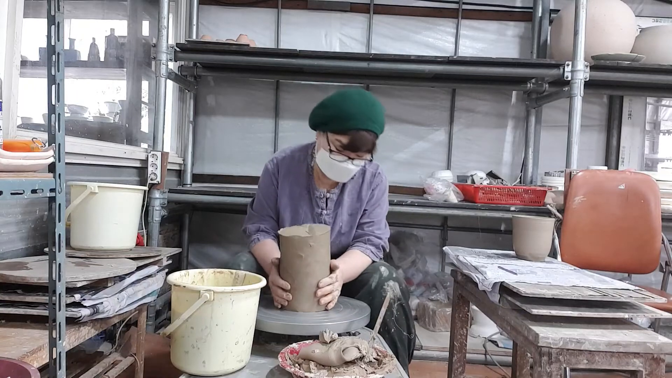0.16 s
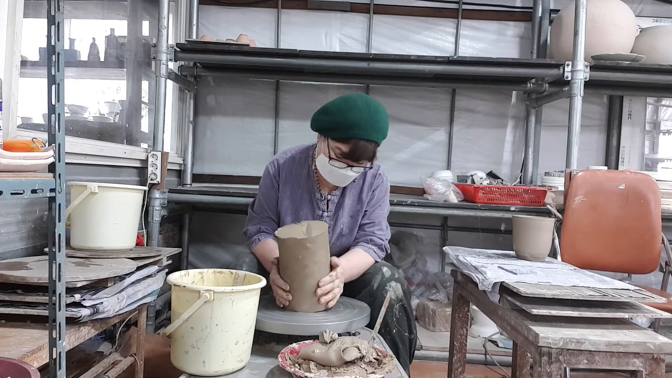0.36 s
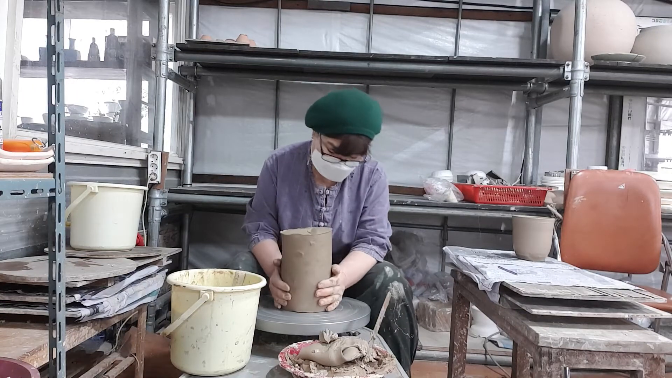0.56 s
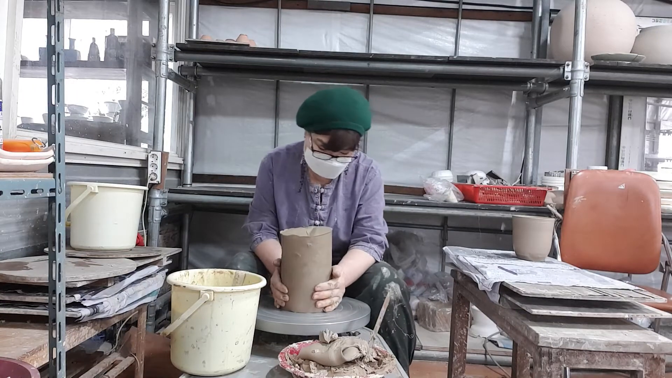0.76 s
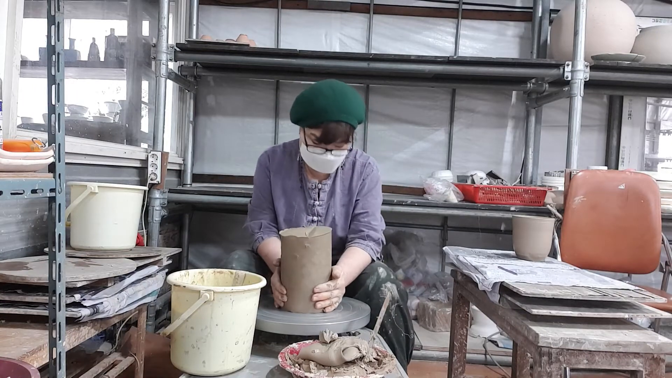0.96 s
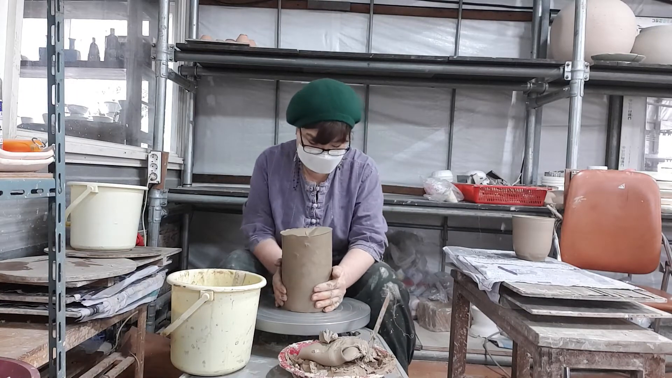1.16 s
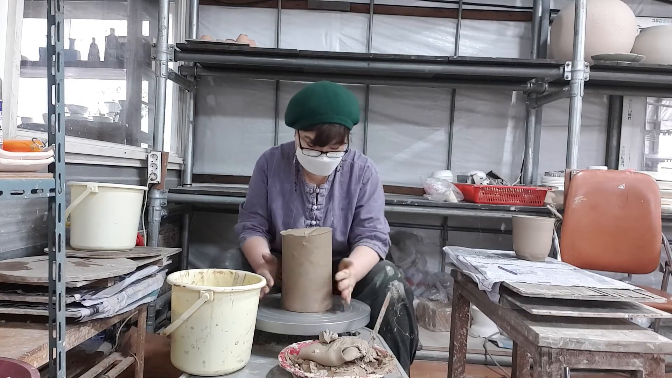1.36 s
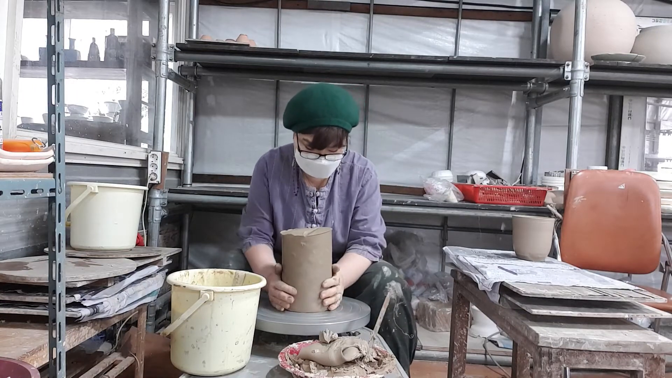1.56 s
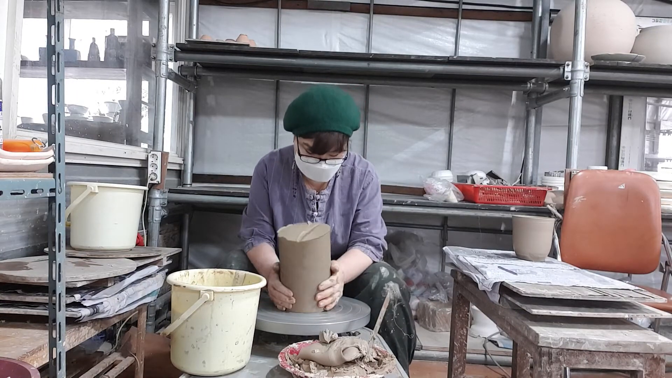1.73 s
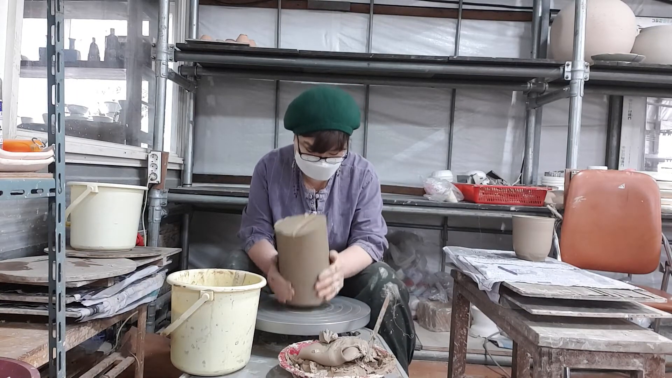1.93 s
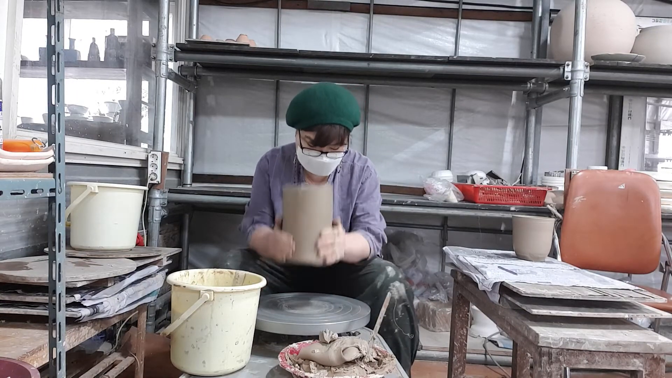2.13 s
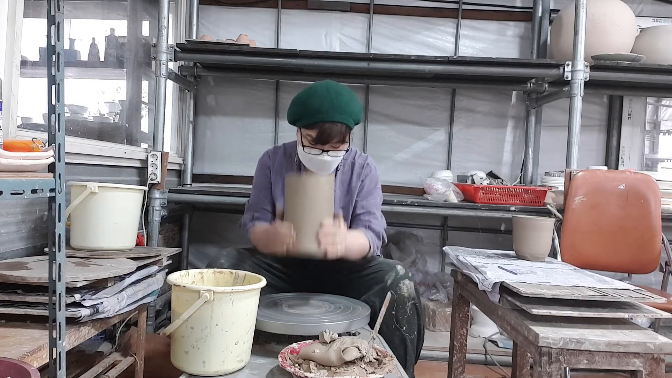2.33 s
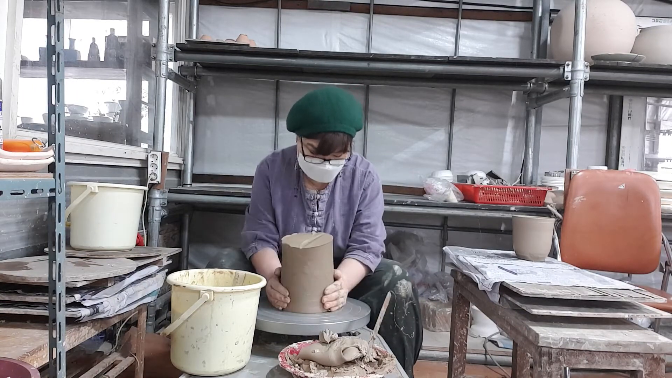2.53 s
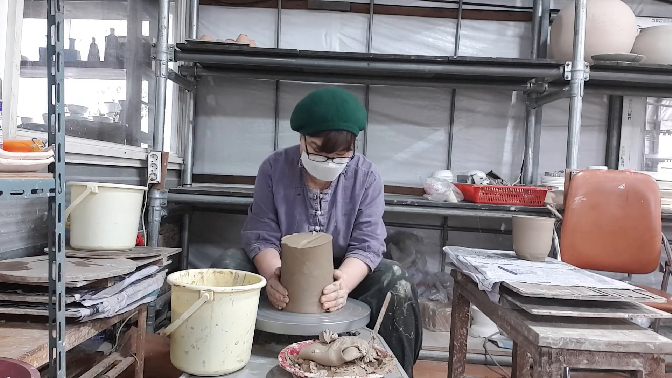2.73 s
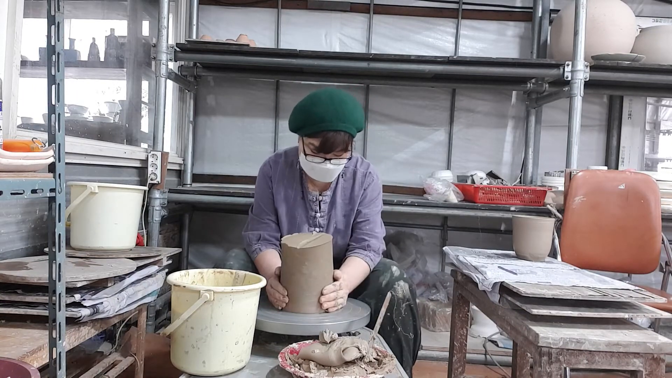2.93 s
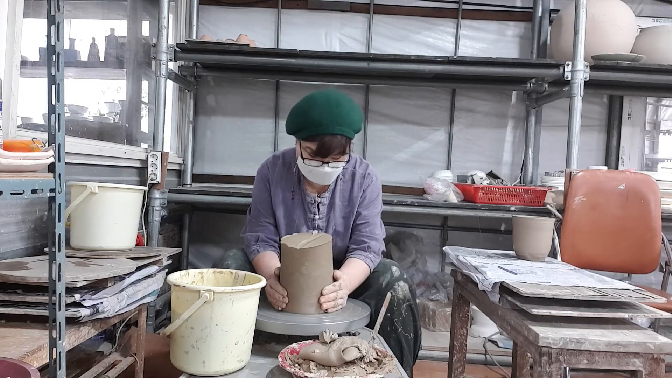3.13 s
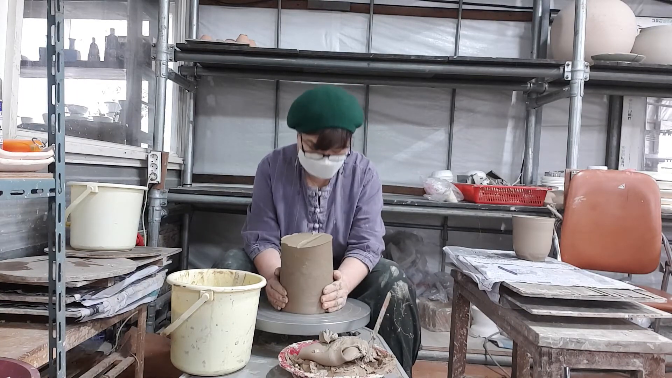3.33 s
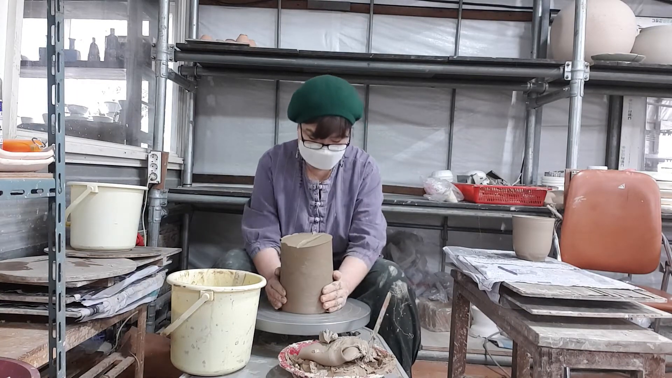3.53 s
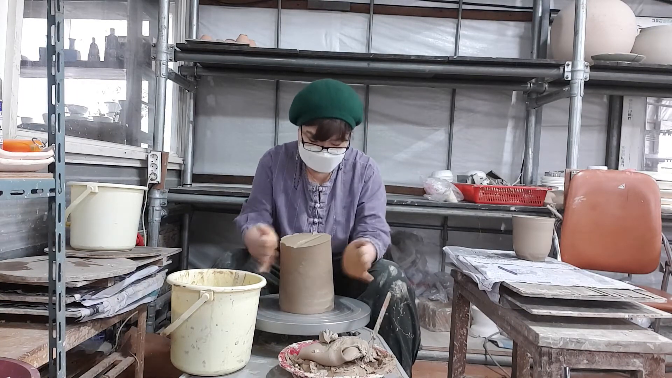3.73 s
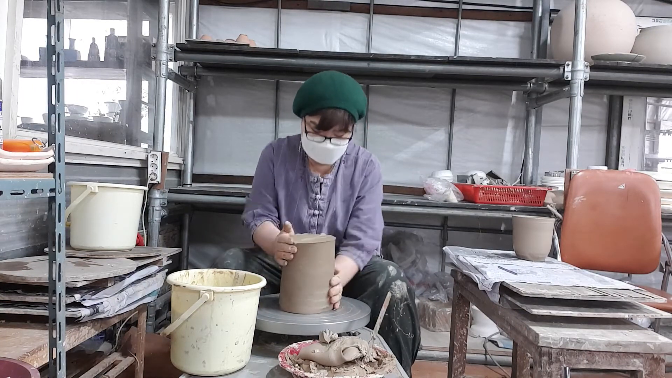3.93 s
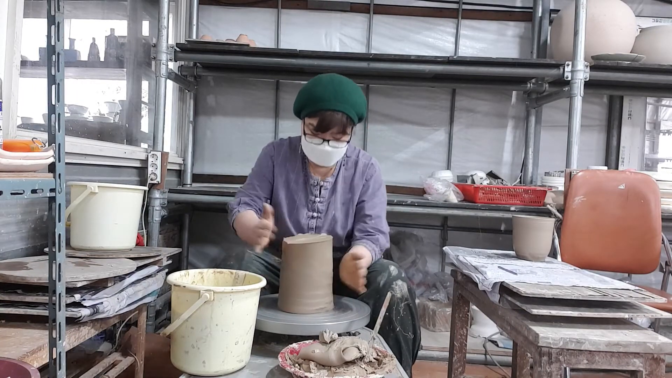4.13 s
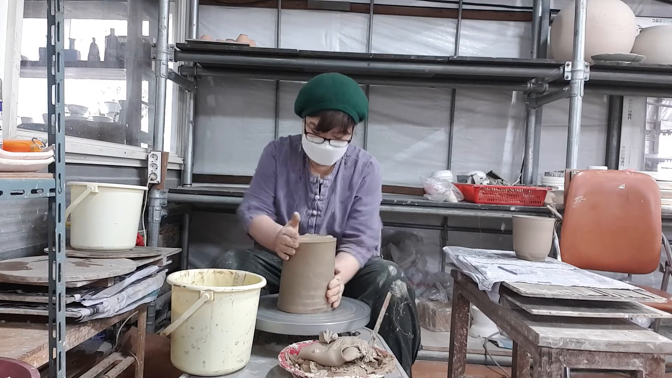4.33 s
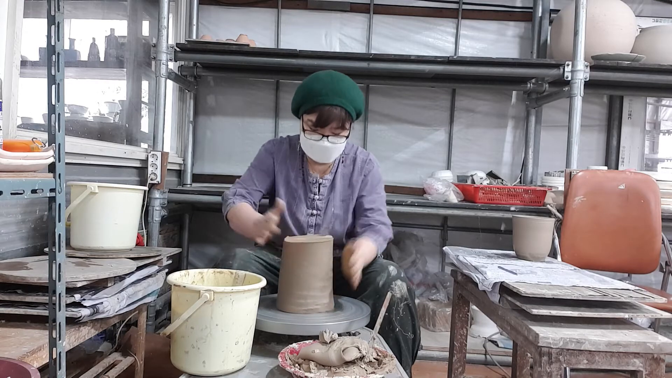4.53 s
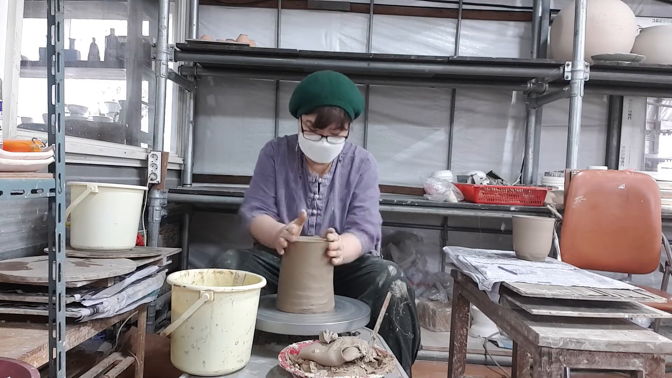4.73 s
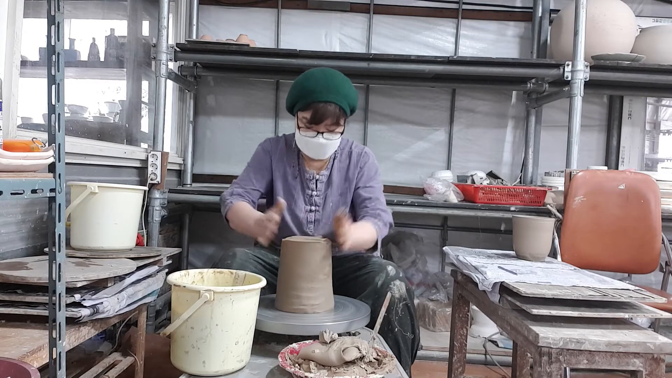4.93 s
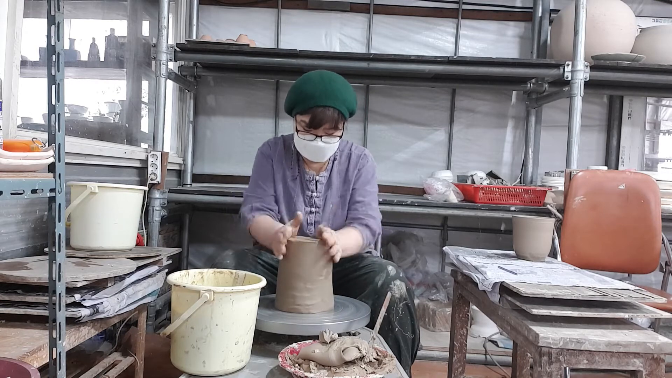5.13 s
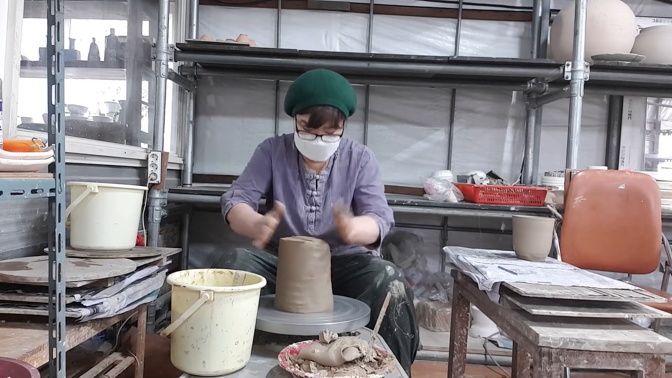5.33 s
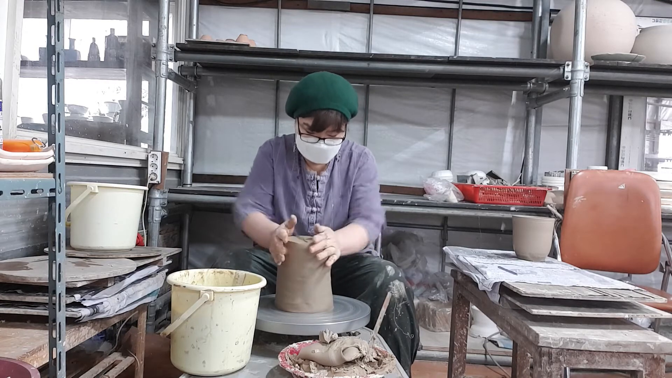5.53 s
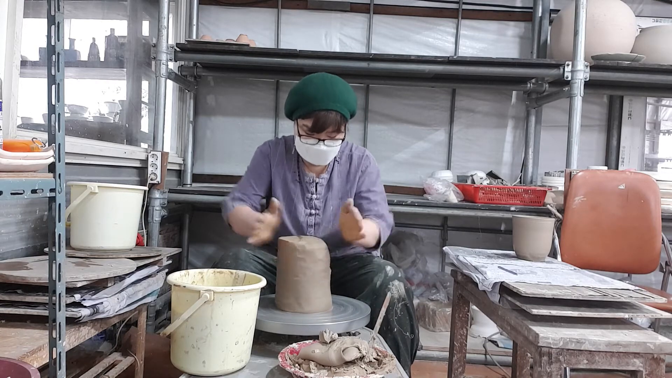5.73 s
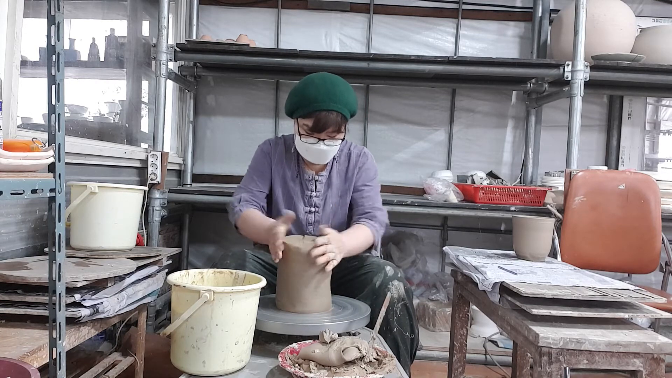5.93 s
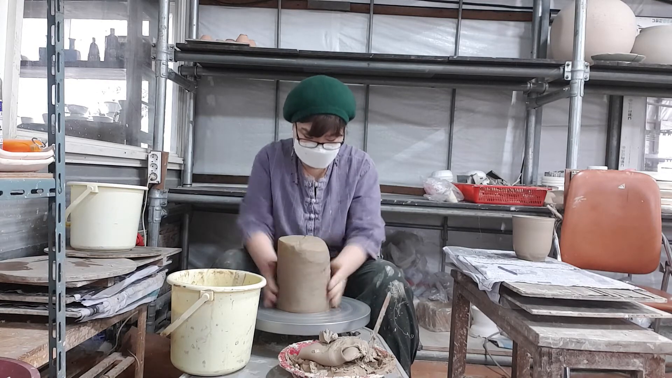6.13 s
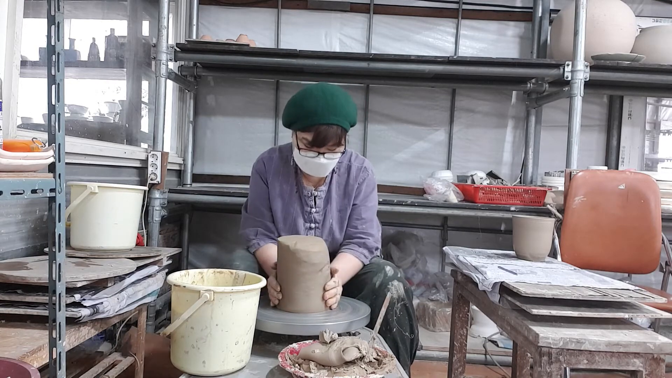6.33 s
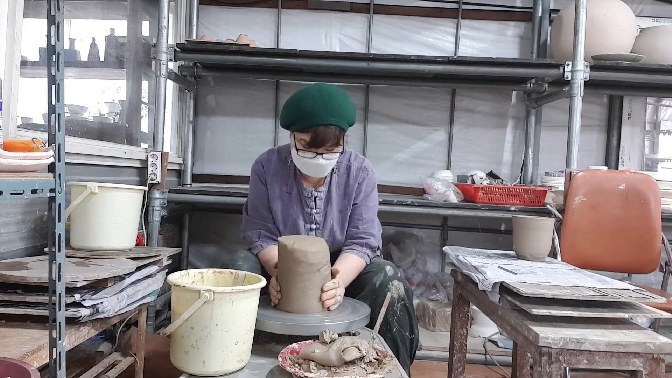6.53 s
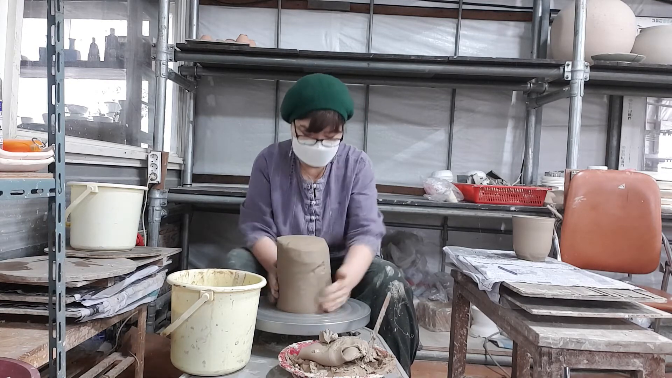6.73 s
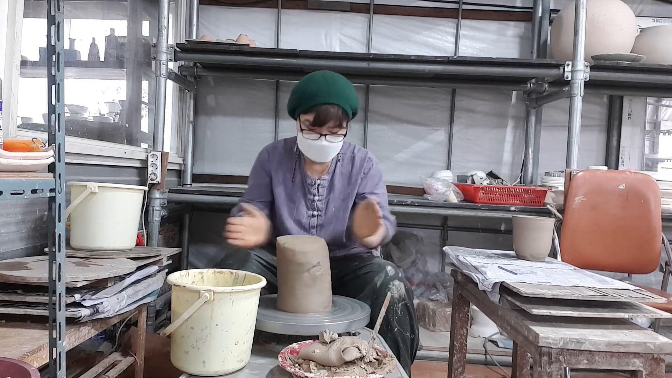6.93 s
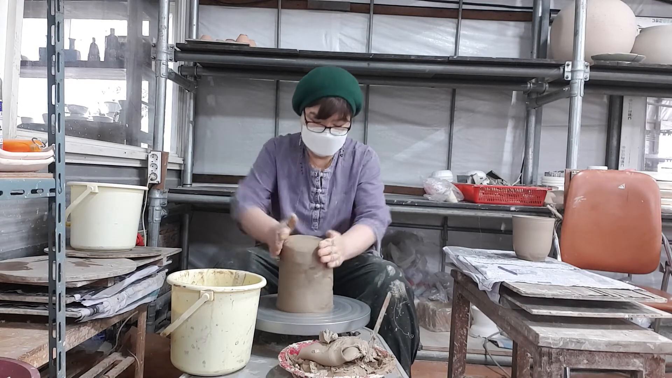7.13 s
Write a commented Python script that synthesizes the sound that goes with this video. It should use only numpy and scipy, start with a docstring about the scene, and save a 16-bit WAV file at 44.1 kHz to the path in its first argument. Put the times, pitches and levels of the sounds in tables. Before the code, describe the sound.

A potter works a lump of wet clay in a hard-walled workshop. Faint sticky noises lead to a grainy peel as the lump lifts off, then a heavy wet slam makes the metal wheel head ring briefly. After a pause come uneven wet pats, the last crisp and strong. Low traffic rumble and engine drones continue outside. Stereo microphones stand a few metres away, with slight hiss.

```python
"""A potter peels wet clay off a kick wheel, slams it back on the wheel head and pats it toward the centre.
Slaps are short coloured bursts, peeling is grainy noise, and the wheel rings as a bank of dying sines.
A hard-walled workshop answers the clay at once and then with a short noise tail.
On a road outside, traffic rumbles as bands of noise and drones as gliding tones, under a faint hiss."""
import sys
import numpy as np
from scipy import signal
from scipy.fft import rfft, irfft, next_fast_len
from scipy.io import wavfile
from scipy.ndimage import map_coordinates

SR = 44100
rng = np.random.default_rng(int(sys.argv[2]) if len(sys.argv) > 2 else 0)


def put_to_file(sound):
    """Save the sound as 16-bit audio at rate SR, in the file named by the first command-line argument."""
    columns = np.atleast_2d(sound).T  # one column per channel
    safe = np.clip(columns, -1, 1)
    whole_steps = np.round(safe * 32767)
    wavfile.write(sys.argv[1], SR, whole_steps.astype(np.int16))


N = 320827  # length in samples


def amp(db):
    """Decibels to gain."""
    return 10 ** (np.asarray(db) / 20)


def unit(x):
    """Scale to rms 1."""
    return x / np.sqrt(np.mean(x ** 2) + 1e-20)


def along(points, hz):
    """Read (Hz, value) points on a log frequency axis."""
    f, v = np.transpose(points)
    return np.interp(np.log(hz + 1), np.log(f + 1), v)


def wobble(rate):
    """A smooth random curve with rate knots a second."""
    knots = rng.standard_normal(int(N * rate / SR) + 4)
    return map_coordinates(knots, [np.arange(N) * rate / SR])


def swell(s, half):
    """A smooth rise and fall around time s."""
    return np.exp(-((np.arange(N) / SR - s) / half) ** 2)


def band(hz, centre, q, order=2):
    """Gain of a broad resonance with steep skirts."""
    detuning = q * ((hz + 1) / centre - centre / (hz + 1))
    return 1 / np.hypot(1, detuning ** order)


def filtered(x, response):
    """Multiply the spectrum of x by a response of frequency."""
    m = next_fast_len(N + SR // 2)
    return irfft(rfft(x, m) * response(np.fft.rfftfreq(m, 1 / SR)), m)[..., :N]


def add(track, s, sound):
    """Mix a sound in at time s."""
    part = track[..., round(s * SR):][..., :sound.shape[-1]]
    part += sound[..., :part.shape[-1]]


# How alike diffuse sound is at the two microphones. Each row: frequency in Hz, left-right likeness (-1 to 1).
LIKENESS = [(60, 0.91), (250, 0.97), (500, 0.62), (800, .1), (1400, -0.26), (3000, .05), (10000, .03)]


def rush(spectrum):
    """Diffuse stereo noise of rms 1: the mid and side shares set the likeness of left and right."""
    def mid_side_gains(hz):
        turn = np.arccos(np.clip(along(LIKENESS, hz), -1, 1)) / 2
        return amp(along(spectrum, hz)) * [np.cos(turn), np.sin(turn)]

    mid, side = filtered(rng.standard_normal((2, N)), mid_side_gains)
    return unit(np.array([mid + side, mid - side]))


# The road outside as vehicles come and go. Each row: time in seconds, loudness in dB.
ROAD_LOUDNESS = [(0.0, -59), (0.69, -61), (1.01, -58.5), (1.74, -50), (2.24, -51.5), (2.47, -50),
                 (2.71, -52.5), (3.73, -52.5), (3.89, -52.5), (5.04, -50), (6.84, -58.5), (7.01, -57.5),
                 (7.27, -56.5)]
USUAL_DB = -54.5  # the road at its usual loudness


def road_above_usual():
    """Loudness of the road over its usual level, in dB for each sample."""
    seconds, db = np.transpose(ROAD_LOUDNESS)
    return np.interp(np.arange(N) / SR, seconds, db) - USUAL_DB


# Colour of the hiss. Each row: frequency in Hz, relative level in dB.
HISS_COLOUR = [(1000, 12), (4000, 3), (7500, -10), (10000, 12.5), (13000, 17.5), (15500, 17)]


def hiss(hiss_db=-80, grows=0.51):
    """A faint diffuse hiss gains grows dB for each dB of the road."""
    return amp(hiss_db + grows * road_above_usual()) * rush(HISS_COLOUR)


def drone(row, waver, waver_rate, overtone_db, flutter_db=1.0):
    """A far, unsteady tone with a weak octave swells and glides by."""
    s, half, centre_hz, glide, db = row
    hz = centre_hz + glide * (np.arange(N) / SR - s)
    phase = 2 * np.pi * np.cumsum(hz * (1 + waver * wobble(waver_rate))) / SR
    tone = np.sqrt(2) * (np.sin(phase) + amp(overtone_db) * np.sin(2 * phase))
    return amp(db + flutter_db * wobble(waver_rate)) * swell(s, half) * tone


# Colours of the road's rumble, body and tyre roar. Each row: frequency in Hz, relative level in dB.
RUMBLE_COLOUR = [(20, -16.5), (32, -18), (46, -4.5), (58, -.5), (78, -7.5), (105, -13.5), (150, -17.5),
                 (300, -85.5)]
BODY_COLOUR = [(70, -17), (120, 6), (160, 2.5), (195, 8), (260, 2), (350, -10), (600, -51)]
TYRE_COLOUR = [(200, -14.5), (350, -1.5), (520, -2), (700, -2), (920, 2), (1120, -3), (1300, -5.5),
               (1750, -10.5), (2300, -20.5), (2750, -27), (3200, -37), (4500, -42.5), (8000, -62)]
# Engines that drone up and fade. Each row: peak time in seconds, half length in seconds,
# pitch at the peak in Hz, glide in Hz per second, level in dB.
ENGINES = [(0.19, 0.25, 79, -5, -45), (1.658, 0.3, 76, 0.5, -40), (2.08, 0.12, 57, 10, -37.5),
           (3.25, 0.46, 68.3, -1, -39.5), (3.1, .5, 187, -0.5, -51), (4.1, .27, 122.8, -7.5, -45.5),
           (4.75, .3, 118, -9.5, -48), (3.5, 0.12, 62, -6.5, -38.5)]
RUMBLE_DB, BODY_DB, TYRE_DB = -41.5, -50, -50  # each layer at the usual loudness
# dB gained for each dB of the road: the bass also carries from far away
RUMBLE_GROWS, BODY_GROWS, TYRE_GROWS = .4, 0.6, 0.95


def traffic():
    """One loudness drives three noise layers, each wavering by itself; engine tones drone through them."""
    busy = road_above_usual()
    rumble = amp(RUMBLE_DB + RUMBLE_GROWS * busy + 0.77 * wobble(7.8)) * rush(RUMBLE_COLOUR)
    body = amp(BODY_DB + BODY_GROWS * busy + .9 * wobble(15)) * rush(BODY_COLOUR)
    roar = amp(TYRE_DB + TYRE_GROWS * busy + 0.65 * wobble(4.2)) * rush(TYRE_COLOUR)
    engines = sum(drone(row, waver=.004, waver_rate=9, overtone_db=-19.5) for row in ENGINES)
    return rumble + body + roar + engines


# A faint far squeal. One row: peak time in seconds, half length in seconds, pitch at the peak in Hz,
# glide in Hz per second, level in dB.
FAR_SQUEAL = (7.24, 0.02, 1121.5, -200, -50.5)
# Vague far-off noises. Each row: peak time in seconds, half length in seconds, centre in Hz, level in dB.
FAR_SWELLS = [(0.174, .073, 577, -58.5), (4.854, 0.063, 1830, -55), (5.5, .45, 125.6, -47),
              (5.905, 0.52, 253, -56), (6.28, .08, 606, -52)]


def far_noises(swell_q=1.94):
    """Soft swells of band-passed noise and one wavering squeal among the traffic."""
    out = drone(FAR_SQUEAL, waver=0.0048, waver_rate=81, overtone_db=-15)
    for s, half, centre_hz, db in FAR_SWELLS:
        noise = unit(filtered(rng.standard_normal((2, N)), lambda hz: band(hz, centre_hz, swell_q)))
        out = out + amp(db) * swell(s, half) * noise
    return out


# Decay of the hard-walled workshop. Each row: frequency in Hz, time to fall 60 dB in seconds.
ROOM_DECAY = [(100, 1), (500, 0.19), (1500, 0.3), (3000, 0.44), (5500, 0.54), (9000, 0.42), (12000, 0.39),
              (16000, 0.21)]


def workshop(x, near_db=-8, tail_db=-6, near_t60=0.081, build=0.023, bass_hz=500):
    """Nearby shelves scatter the sound at once; the hall's tail builds up behind them."""
    hz, frames, z = signal.stft(rng.standard_normal((2, SR)), SR, nperseg=256)
    decay = amp(-60 * frames / along(ROOM_DECAY, hz)[:, None])
    tail = signal.istft(z * decay, SR, nperseg=256)[1]
    t = np.arange(tail.shape[1]) / SR
    tail = tail * (1 - np.exp(-t / build))
    near = rng.standard_normal(tail.shape) * amp(-60 * t / near_t60) * (t > .002)
    answer = amp(near_db) * near / np.linalg.norm(near[0]) + amp(tail_db) * tail / np.linalg.norm(tail[0])
    # thin walls let the bass escape
    answer = signal.lfilter(*signal.butter(1, bass_hz, "high", fs=SR), answer)
    return signal.fftconvolve(x, answer, axes=1)[:, :N]


# Colour of tacky clay. Each row: frequency in Hz, relative level in dB.
TACKY_COLOUR = [(2000, -8), (4000, -17), (7300, -14), (9300, 1), (11000, -4.5), (15500, -6.5)]
# Sticky clay letting go of the wheel or the fingers. Each row: peak time in seconds,
# level in dB before the overall trim, rise in seconds, fall in seconds.
LETTING_GO = [(.225, -65.5, .05, 0.029), (.52, -67, .014, 0.012), (.83, -76, .05, 0.054),
              (1.34, -77, .03, .04), (1.49, -75, .05, .12), (1.725, -55, .032, 0.11),
              (1.91, -44.5, .008, 0.011), (2.88, -70, .008, 0.011), (3.65, -74.5, .05, 0.054),
              (6.2, -71.5, .03, .03), (6.756, -69, .03, 0.049)]


def peel(peel_db=-2, grain_db=4):
    """Sticky clay lets go as grainy noise that rises exponentially to a peak, then dies away."""
    t = np.arange(N) / SR
    pull = 0
    for s, db, rise, fall in LETTING_GO:
        pull = pull + amp(db) * np.exp(-np.maximum((s - t) / rise, (t - s) / fall))
    grains = unit(rush(TACKY_COLOUR) * amp(grain_db * wobble(900)))
    return amp(peel_db) * pull * grains


SLAM_S = 2.489  # the lump lands
# Ringing of the wheel head and frame. Each row: frequency in Hz, level in dB, time to fall 60 dB in seconds.
WHEEL_MODES = [(72, -21.5, 0.23), (107.5, -29, .56), (136, -23.5, .19), (351.4, -32, 0.15),
               (456, -16, 0.036), (503, -21.5, .36), (634, -40, .6), (910, -42, .4), (1910, -47, 0.42),
               (2073, -38.5, 0.24), (2800, -46.5, 0.51), (3000, -48, .35)]


def slam(rise_cycles=0.91, thud_db=-11, thud_hz=120, sink_s=.0155, half_s=0.0061):
    """Wheel head and frame ring; the lump's full weight follows as one low shove while it flattens."""
    out = np.zeros((2, N))
    t = np.arange(SR) / SR
    ring = np.zeros(SR)
    for hz, db, t60 in WHEEL_MODES:
        onset = 1 - np.exp(-(t * hz / rise_cycles) ** 2)
        ring += amp(db - 60 * t / t60) * np.sin(2 * np.pi * hz * t) * onset
    shove = -np.cos(2 * np.pi * thud_hz * (t - sink_s)) * np.exp(-((t - sink_s) / half_s) ** 2)
    add(out, SLAM_S, ring + amp(thud_db) * shove)
    return out


LEAD_S = .004  # a short soft fade-in before each full blow


def burst(colour_db, length, snap, size=4096):
    """A sharp contact and a dying fizz through a causal colour, with the energy of 10 ms at rms 1."""
    t = (np.arange(size) - round(LEAD_S * SR)) / SR
    # one noise shared by both ears plus one for each
    fizz = rng.standard_normal(size) + rng.standard_normal((2, size))
    fizz = fizz * np.exp(-abs(t) / length) * (t >= 0)
    push = rfft(fizz / np.linalg.norm(fizz[0]) + snap * (t == 0))
    # flatten the noise burst so that only the given colour shapes it, then fade it in time
    push = irfft(push / abs(push))
    push = push * np.clip(1 + t / LEAD_S, 0, 1) ** 2 * np.exp(-(t / (10 * length)) ** 2)
    # folding the cepstrum gives the colour minimum phase, so it never sounds ahead of the push
    cepstrum = irfft(np.log(amp(colour_db(np.fft.rfftfreq(size, 1 / SR)))))
    cepstrum[1:size // 2] *= 2
    cepstrum[size // 2 + 1:] = 0
    coloured = irfft(rfft(push) * np.exp(rfft(cepstrum)))
    return unit(coloured) * np.sqrt(SR / 100 / size)


# Colour of the lump's wet base landing. Each row: frequency in Hz, relative level in dB.
SPLAT_COLOUR = [(60, -10.5), (250, -2.5), (450, 19.5), (600, 8.5), (1000, 7), (1350, 1), (1850, 8),
                (2500, -3), (4500, -9), (7300, -10.5), (9000, -4), (12000, -12.5), (16000, -15.5)]


def splat(splat_db=-16):
    """The wet base of the lump smacks flat on the wheel head."""
    out = np.zeros((2, N))
    smack = burst(lambda hz: along(SPLAT_COLOUR, hz), length=0.0064, snap=0.6)
    add(out, SLAM_S - LEAD_S, amp(splat_db) * smack)
    return out


# Colours of clay knocked on the wheel and of water squeezed out. Each row: frequency in Hz, relative level in dB.
KNOCK_COLOUR = [(40, -42), (80, 4), (115, 9), (180, -15), (290, -8), (440, 1.5), (620, -6.5), (1000, -1.5),
                (1400, -11.5), (2200, -10.5), (5000, -30)]
SPRAY_COLOUR = [(1500, -14.5), (5000, -14), (7300, -9.5), (9000, -1.5), (11000, -2.5), (14000, -3.5),
                (16000, 6)]
# Palm pats on clay, some built of two overlapping bursts; each row is one burst: time in seconds,
# squeeze length in seconds, smack level in dB, air pocket in Hz, pocket Q, wet spray level in dB, knock level in dB.
PAT_BURSTS = [(3.8182, .007, -45, 2210, 2.3, -52.5, -34), (3.842, .0051, -42, 5650, 0.43, -55.5, -51),
              (3.848, 0.0033, -61.5, 5700, .54, -51, -38.5), (4.2667, 0.0073, -45.5, 5860, .95, -55, -45),
              (4.2772, 0.0013, -30.5, 4140, 1.19, -35, -32.5), (4.2779, 0.0022, -36, 2970, 2.3, -48, -38.5),
              (4.6665, 0.011, -64, 5960, .8, -50, -70), (4.6936, 0.0044, -36, 5420, 1.06, -40.5, -38.5),
              (5.111, 0.017, -59.5, 4960, 0.47, -50.5, -49.5), (5.4755, 0.004, -61.5, 5200, 1.4, -36, -41),
              (5.8175, 0.0023, -36.5, 2440, 1.3, -29, -40), (5.82, 0.026, -34.5, 2640, 0.58, -30, -40.5),
              (7.024, 0.003, -24.5, 7100, 1.5, -28.5, -27.5), (7.0256, 0.0093, -25, 4740, 0.73, -27.5, -42)]
# top of a light and of a heavy spray; the level between them
FINE_SPRAY_HZ, COARSE_SPRAY_HZ, COARSE_DB = 16070, 11900, -35


def pats(brisk_s=0.0024):
    """Palm pats as bursts that blend a popping air pocket, a water spray and a knock of the lump on the wheel."""
    out = np.zeros((2, N))
    hz = np.fft.rfftfreq(4096, 1 / SR)  # the grid of burst()
    for s, length, smack_db, pocket_hz, pocket_q, spray_db, knock_db in PAT_BURSTS:
        # a heavy spray has bigger drops and sounds duller
        fineness = 1 / (1 + amp(spray_db - COARSE_DB) ** 2)
        top_hz = COARSE_SPRAY_HZ + (FINE_SPRAY_HZ - COARSE_SPRAY_HZ) * fineness
        pocket = amp(smack_db) * unit(band(hz, pocket_hz, pocket_q, order=4))
        spray = amp(spray_db) * unit(amp(along(SPRAY_COLOUR, hz)) / np.hypot(1, (hz / top_hz) ** 5))
        knock = amp(knock_db) * unit(amp(along(KNOCK_COLOUR, hz)))
        power = pocket ** 2 + spray ** 2 + knock ** 2
        snap = 1 / (1 + (length / brisk_s) ** 2)  # only a brisk squeeze makes a hard crack
        blow = burst(lambda hz: 10 * np.log10(power), length, snap)
        add(out, s - LEAD_S, np.sqrt(power.mean()) * blow)
    return out


def scene():
    """Clay work in the room, over the road and a faint hiss."""
    clay = pats() + splat() + peel()
    wheel = slam()
    room = workshop(clay + amp(-6) * wheel)
    return clay + wheel + room + traffic() + far_noises() + hiss()


TOP_HZ = 15800  # band limit of the microphones


def record(dry, balance_db=1.43):
    """The right microphone is a little louder than the left; a steep cut ends the treble."""
    balanced = dry * amp([[-balance_db], [balance_db]])
    return filtered(balanced, lambda hz: 1 / (1 + (hz / TOP_HZ) ** 120))


dry = scene()
out = record(dry)
put_to_file(out)
```